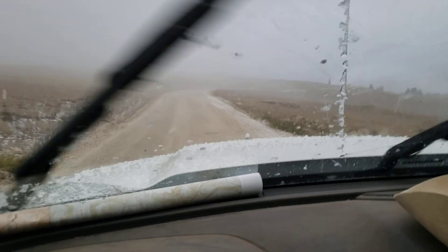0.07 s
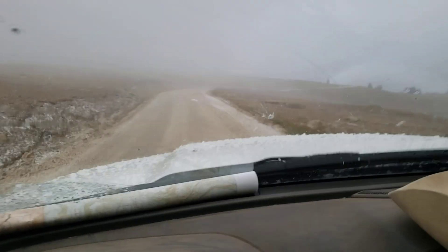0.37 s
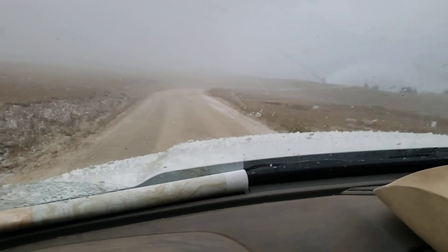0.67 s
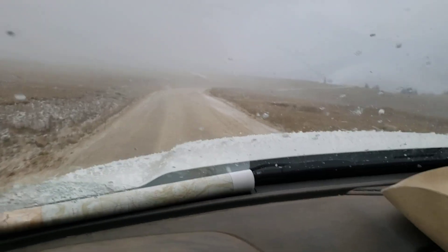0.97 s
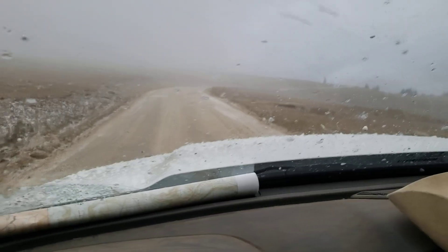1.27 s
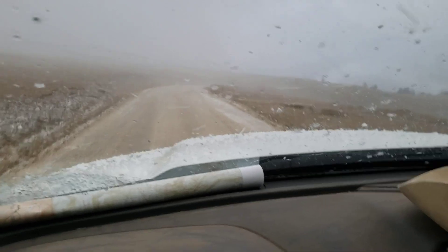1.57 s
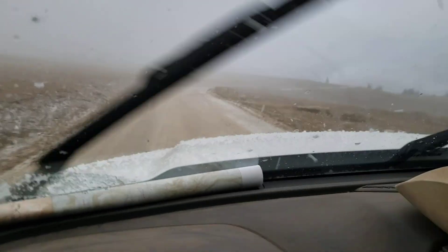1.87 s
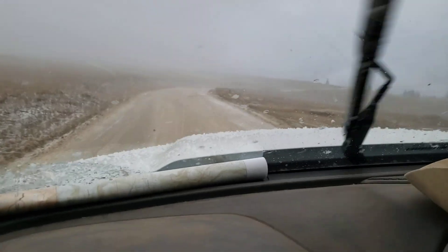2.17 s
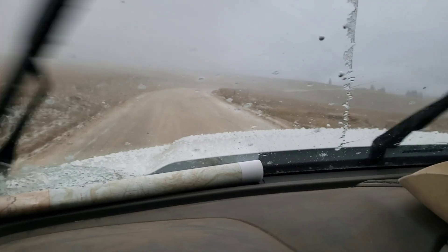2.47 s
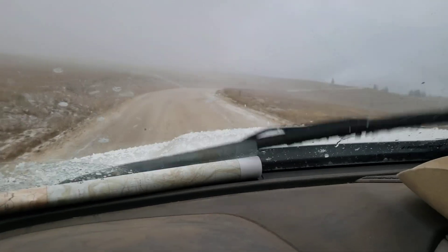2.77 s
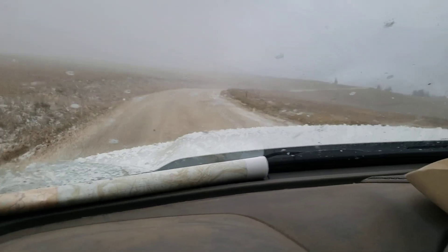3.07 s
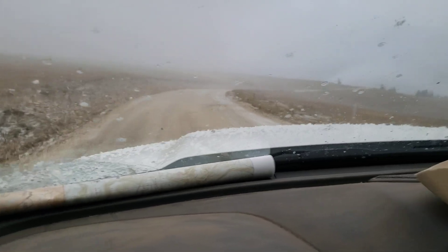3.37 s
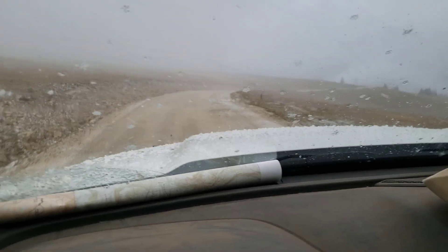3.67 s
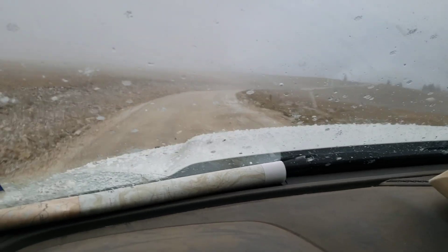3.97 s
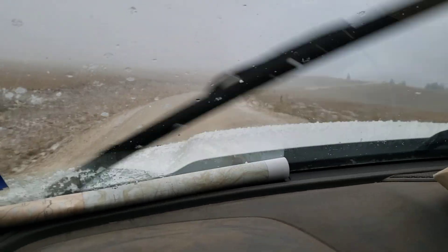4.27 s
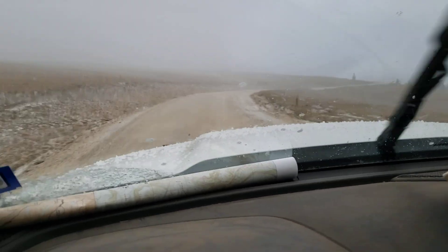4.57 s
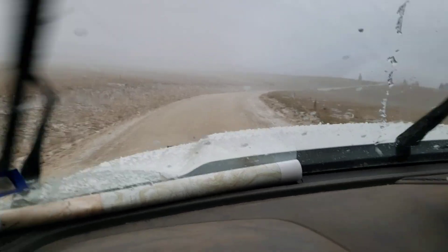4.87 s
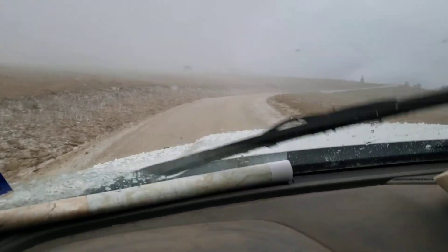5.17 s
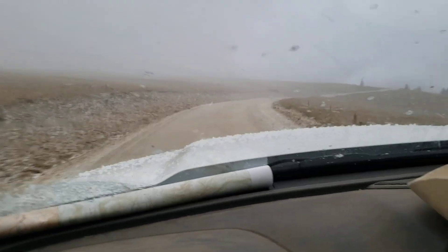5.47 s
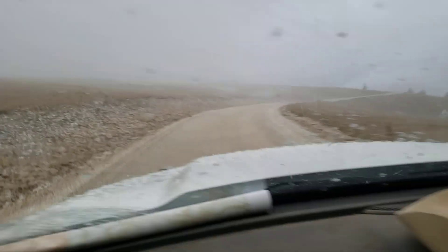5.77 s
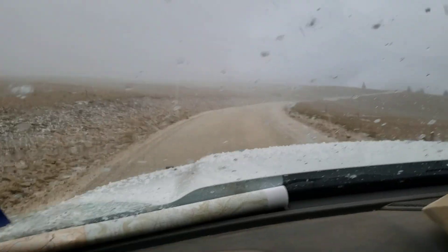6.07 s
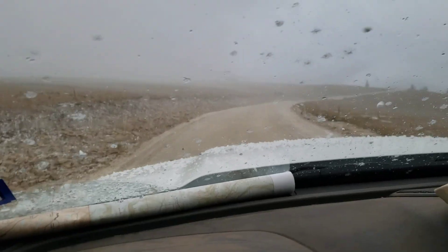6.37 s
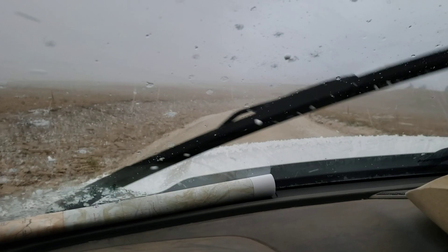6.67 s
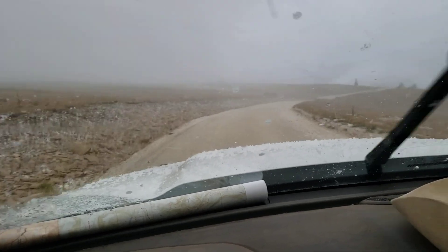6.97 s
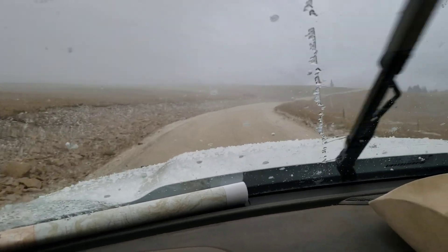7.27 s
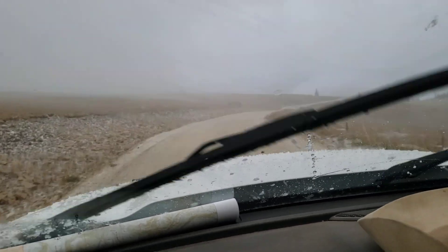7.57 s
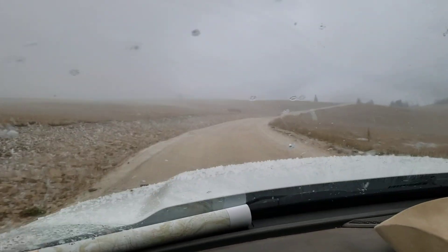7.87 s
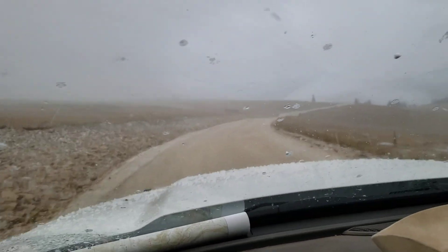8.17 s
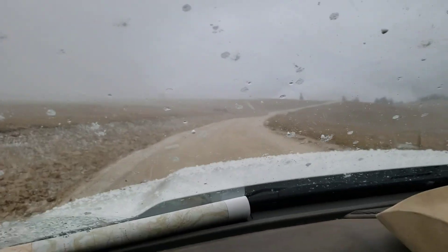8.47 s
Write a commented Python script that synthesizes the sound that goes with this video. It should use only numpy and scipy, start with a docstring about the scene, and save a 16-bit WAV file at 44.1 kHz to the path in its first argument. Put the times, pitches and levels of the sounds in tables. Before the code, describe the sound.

Sleet patters densely on the windscreen of a slow car, with harder ice pellets snapping against the glass in bright, splashy ticks. Underneath, a low engine drone and road rumble continue, swelling into booms at bumps in the dirt road. Tyres softly crunch grit and hiss through slush, loose trim knocks dully, and wipers swish faintly every few seconds. The microphone is inside the cabin.

```python
"""Sleet patters on a windscreen over engine drone and road rumble, heard inside a slow car on a dirt road.
Ice pellets ring the pane; hard ones splash into bright fragments. Tyres crunch grit, fling stones and
throw up hissing slush. Bumps shake the chassis and cabin panels boom. Wipers swish over the wet glass
about every 2.5 s. Dull cabin knocks come from loose trim and from wipers turning at the top of a stroke."""
import sys
import numpy as np
from scipy import signal
from scipy.fft import rfft, irfft, next_fast_len
from scipy.io import wavfile
from scipy.ndimage import map_coordinates

SR = 44100
rng = np.random.default_rng(int(sys.argv[2]) if len(sys.argv) > 2 else 0)


def put_to_file(sound):
    """Save the sound as 16-bit audio at rate SR, in the file named by the first command-line argument."""
    columns = np.atleast_2d(sound).T  # one column per channel
    safe = np.clip(columns, -1, 1)
    whole_steps = np.round(safe * 32767)
    wavfile.write(sys.argv[1], SR, whole_steps.astype(np.int16))


N = 384111

# shower strength: time_s, level_db
SHOWER_LEVEL = [(0.0, -44.5), (0.39, -48.3), (0.51, -42.5), (0.87, -49), (0.96, -44), (1.53, -47.5),
                (1.68, -39), (1.77, -54.5), (1.89, -46), (2.54, -53.5), (2.87, -41), (3.02, -54.5),
                (3.14, -44), (3.38, -53.5), (3.5, -45), (3.71, -50), (3.86, -41.5), (4.1, -54.5),
                (4.61, -47), (4.7, -53.5), (5.99, -45.5), (6.11, -49.5), (6.38, -43.5), (6.44, -53),
                (6.85, -47.5), (6.94, -55.5), (7.09, -49), (7.78, -46.5), (8.02, -57.5), (8.08, -45.5),
                (8.35, -45), (8.71, -55)]
# engine: time_s, firing_hz, level_db
ENGINE_TRACK = [(0, 48.5, -32), (.8, 49, -30), (2.2, 50, -29), (3.6, 49.3, -29), (5, 48, -30),
                (6.5, 47.3, -30), (8.71, 47, -29)]
# road bumps: start_s, length_s, rumble_db, boom_db
BUMPS = [(0.53, 0.13, -24.5, -48), (1.102, 0.08, -21.5, -30), (1.41, 0.27, -26, -31.5),
         (1.903, 0.13, -25.5, -30.5), (3.368, 0.18, -26.5, -33), (4.246, .16, -25, -33),
         (4.716, 0.089, -25.5, -30.5), (5.03, 0.3, -26.5, -55), (5.64, 0.045, -21, -30.5),
         (5.908, .2, -23, -31), (6.23, 0.38, -30.5, -35), (6.795, 0.31, -29.5, -65),
         (7.222, 0.05, -32, -30.5), (7.58, 0.17, -27, -33), (7.966, 0.12, -23, -47),
         (8.108, 0.33, -26, -33.5), (8.42, 0.18, -24, -32)]
# slush sheets: centre_s, length_s, level_db
SLUSH_SHEETS = [(2.01, 0.18, -52), (6.1, 0.71, -52), (8.42, .45, -47.5)]
# heavy pellets: start_s, level_db, pitch_hz, splash_db
PELLETS = [(0.0106, -22, 2950, -25), (0.0909, -21.5, 2040, -13.5), (0.2533, -18, 3400, -25),
           (0.4723, -27, 1640, -51), (0.5476, -28, 3960, -16), (0.6065, -43, 3660, 3),
           (0.7401, -17, 2050, -13.5), (0.8313, -23.5, 3850, -28), (0.849, -24, 3540, -29),
           (0.9106, -18, 2030, -15.5), (0.9882, -21, 2150, -16), (1.0017, -23, 2720, -20),
           (1.0366, -28, 2300, -3), (1.0693, -19.5, 2280, -20), (1.1583, -21, 2400, -40),
           (1.231, -24.5, 2290, -36), (1.258, -20, 3560, -12), (1.3944, -26, 2360, -46),
           (1.5923, -23, 2330, -18), (1.6327, -22.5, 2160, -20), (1.9121, -22, 2380, -21),
           (2.2333, -26, 1960, -13), (2.2468, -22.5, 2140, -11), (2.2972, -25.5, 2810, -20),
           (2.3231, -24.5, 2100, -7), (2.59, -25.5, 2150, -14), (2.6332, -22, 3450, -25),
           (2.7492, -21.5, 2400, -20), (2.8295, -21.5, 2380, -23), (3.0115, -26.5, 1410, -15),
           (3.1522, -20, 1980, -33), (3.1597, -18.5, 3350, -14), (3.172, -21.5, 2620, -27),
           (3.2076, -22.5, 1610, -27), (3.488, -24.5, 1860, -25), (3.6295, -27, 2100, -30),
           (3.7454, -19.5, 1400, -21), (3.799, -24.5, 2600, -31), (3.8372, -20.5, 3720, -8.5),
           (3.9956, -22, 4160, -6), (4.1809, -21.5, 2040, -15), (4.485, -25, 2300, -17),
           (4.5679, -28, 1610, -6), (4.5844, -36, 2330, 0), (4.6187, -23, 2450, -21),
           (4.8234, -26.5, 2450, -22), (5.1533, -21.5, 1500, -29), (5.6022, -21.5, 3020, -4.5),
           (5.666, -22.5, 2200, -18), (5.8504, -23, 3400, -10), (6.1511, -25, 2050, -19),
           (6.1978, -19, 3200, -17), (6.2946, -20.5, 2200, -6), (6.3809, -30.5, 2160, -18),
           (6.41, -23.5, 2610, -20), (6.5527, -26.5, 2580, -16), (6.8048, -21, 3600, -21),
           (6.8427, -23, 2080, -23), (7.0655, -23.5, 2290, -13), (7.1373, -24.5, 2080, -23),
           (7.5831, -24, 2040, -16), (7.665, -31, 2070, -28), (7.8278, -26.5, 1300, -1.5),
           (7.913, -25, 1320, -22), (8.184, -35, 3070, 1), (8.3427, -21.5, 1820, -25)]
# dull cabin knocks (loose trim, wipers turning): start_s, level_db
KNOCKS = [(.096, -21), (0.677, -15), (.686, -18), (1.135, -26), (2.236, -21.5), (2.252, -35), (4.46, -23.5),
          (4.963, -24), (4.985, -20.5), (5.576, -22.5), (7.134, -23), (8.685, -22.5)]
# knock modes: pitch_hz, level_db, t60_s
KNOCK_MODES = [(463, 0, .12), (748, -9, .06), (860, -4, .05), (1066, -3, .04), (1380, -7, .03),
               (1631, -8, .03)]
# wheel jolts: start_s, level_db, pitch_hz
JOLTS = [(1.522, -7.5, 87.5), (1.575, -17.5, 263), (1.936, -14.5, 157), (3.422, -27.5, 263),
         (4.281, -24, 250), (5.949, -19, 244), (6.03, -68, 86), (8.229, -16, 254), (8.235, -14, 91)]
# cabin sound field: freq_hz, left_right_correlation
COHERENCE = [(60, .98), (130, .96), (290, .85), (640, .4), (1000, -.1), (1350, -.35), (2200, .05),
             (5000, -.05)]
# pane and cabin decay: freq_hz, t60_s
PANE_DECAY = [(500, .05), (1500, .038), (4000, .02), (12000, .012)]
CABIN_DECAY = [(300, .15), (2000, .1), (6000, .06), (15000, .045)]
# source spectra: freq_hz, gain_db
GLASS_EQ = [(200, -26.5), (450, 3), (900, 0), (1300, -2), (2200, -0.5), (3700, 0.5), (5200, 0), (6900, -4),
            (7900, -1), (9000, -10.5), (10500, -10), (12500, -5), (15300, -2), (17000, -41)]
PATTER_EQ = [(200, -33), (500, -5), (1200, 1.5), (2200, 5.5), (3600, 1), (5000, -4), (8000, -9),
             (16000, -6)]
SPRAY_EQ = [(2000, -28), (5000, -1), (9000, -10), (15000, -1.5)]
RUMBLE_EQ = [(12, -45), (24, 5), (34, -37.5), (45, -2), (62, 4), (75, 7.5), (86, 5), (95, -1), (110, 3.5),
             (135, -15.5), (220, -49.5), (900, -120)]
BOOM_EQ = [(80, -27), (125, -5), (153, 1), (185, -2), (207, -6), (240, -3.5), (263, -4), (280, -8),
           (340, -11.5), (450, -20.5), (900, -36), (3000, -120)]
TYRE_EQ = [(150, -36.5), (350, 1), (500, 1), (800, -3.5), (1200, -9), (2500, -16), (5000, -31),
           (14000, -60)]
SWAY_EQ = [(12, -64), (24, -35), (33, 30), (42, 17), (60, 2), (400, -120)]
WIPER_EQ = [(200, -40), (600, 8), (1400, 3.5), (3000, -23), (8000, -15), (16000, -44)]
CLATTER_EQ = [(200, -15), (500, 0), (1200, -1), (2500, -7), (6000, -22), (12000, -32)]


def amp(db):
    return 10 ** (np.asarray(db) / 20)


def unit_rms(x):
    return x / np.sqrt(np.mean(x ** 2) + 1e-20)


def log_interp(points, hz):
    """(freq_hz, value) points read on a log axis."""
    freqs_hz, values = np.transpose(points)
    return np.interp(np.log(hz + 1), np.log(freqs_hz + 1), values)


def curves(rows):
    """Per-sample curve for each column after time_s."""
    times_s, *columns = np.transpose(rows)
    return [np.interp(np.arange(N) / SR, times_s, column) for column in columns]


def wobble(rate_hz):
    """Smooth random curve."""
    knots = rng.standard_normal(int(N * rate_hz / SR) + 4)
    return map_coordinates(knots, [np.arange(N) * rate_hz / SR])


def filtered(x, gain, causal=False):
    """Apply gain(hz); causal (minimum phase) keeps attacks sharp."""
    size = x.shape[-1]
    n_fft = 2 * next_fast_len(size * 5 // 8)
    response = gain(np.fft.rfftfreq(n_fft, 1 / SR))
    if causal:
        cepstrum = irfft(np.log(np.maximum(response, 1e-6)))
        response = np.exp(rfft(np.r_[cepstrum[0], 2 * cepstrum[1:n_fft // 2]], n_fft))
    return irfft(rfft(x, n_fft) * response, n_fft)[..., :size]


def coloured(x, eq):
    return filtered(x, lambda hz: amp(log_interp(eq, hz)), causal=True)


def diffuse(size):
    """Stereo white noise, left and right alike in the bass only."""
    def mid_side_gain(hz):
        correlation = np.clip(log_interp(COHERENCE, hz), -.99, .99)
        return np.sqrt([1 + correlation, 1 - correlation])
    mid, side = filtered(rng.standard_normal((2, size)), mid_side_gain)
    return unit_rms(np.array([mid + side, mid - side]))


def noise(eq, size=N):
    return unit_rms(coloured(diffuse(size), eq))


def add(track, start_s, sound):
    start = int(np.clip(round(start_s * SR), 0, N - 1))
    track[:, start:start + sound.shape[-1]] += sound[..., :N - start]


def tails(decay, count, size=4096):
    """Unit-energy stereo decays, t60 set per frequency."""
    white = diffuse(count * size).reshape(2, count, size).swapaxes(0, 1)
    hz, t, bins = signal.stft(white, SR, nperseg=64)
    fade = amp(-60 * t / log_interp(decay, hz)[:, None])
    ring = signal.istft(bins * fade, SR, nperseg=64)[1][..., :size]
    return ring / np.sqrt(np.sum(ring ** 2, axis=-1, keepdims=True))


def impacts(count, snap_db, cabin_db, spread_s=.00035, contact_s=.0006, rise_s=.0004):
    """Blows across the windscreen: contact snap, short pane ring, cabin reflections."""
    ring = tails(PANE_DECAY, count)
    t = np.arange(ring.shape[-1]) / SR
    ring *= 1 - np.exp(-t / rise_s)
    snaps = rng.standard_normal((count, len(t))) * np.exp(-t / contact_s)
    snaps /= np.linalg.norm(snaps, axis=1, keepdims=True)
    # nearer side first
    lags_s = np.maximum(np.round(rng.normal(0, spread_s, (count, 1)) * [1, -1] * SR), 0) / SR
    direct = np.array([[np.interp(t - lag_s, t, snap, left=0) for lag_s in pair]
                       for snap, pair in zip(snaps, lags_s)])
    cabin = coloured(tails(CABIN_DECAY, count), [(1500, 1.2), (4000, 1.1), (9000, 3)])
    return coloured(ring + amp(snap_db) * direct + amp(cabin_db) * cabin, GLASS_EQ)


def scatter(blows, rate_hz, range_db, max_count=6000):
    """Blows at Poisson times and random sizes, rms 1."""
    track = np.zeros((2, N))
    draws = rng.random((max_count, 3))
    times_s = np.cumsum(-np.log(1 - draws[:, 0])) / rate_hz
    for start_s, (_, size, spot) in zip(times_s[times_s < N / SR], draws):
        add(track, start_s, amp(range_db * size ** 2) * blows[int(spot * len(blows))])
    return unit_rms(track)


def pitched(blow, pitch_hz, boost_db=8):
    """Blow with a broad peak at pitch_hz, unit energy."""
    peak = lambda hz: amp(boost_db * np.exp(-np.log2((hz + 1) / pitch_hz) ** 2))
    blow = filtered(blow, peak, causal=True)
    return blow / np.linalg.norm(blow)


def shower_swing_db():
    """Shower strength about its mean."""
    level_db, = curves(SHOWER_LEVEL)
    return level_db - level_db.mean()


def shower(patter_db=3, spray_db=-17.5):
    """Small pellets patter on glass and bonnet; wet ones burst into bright ticks."""
    level_db, = curves(SHOWER_LEVEL)
    blows = impacts(count=96, snap_db=-4, cabin_db=-1)
    patter = unit_rms(coloured(scatter(blows, rate_hz=280, range_db=20), PATTER_EQ))
    spray = unit_rms(coloured(scatter(blows, rate_hz=300, range_db=19), SPRAY_EQ))
    return amp(level_db + patter_db) * patter + amp(level_db + spray_db) * spray


def engine(uneven_db=-2, second_db=-12, waver_db=2):
    """Firing note plus orders 1.5 and 2 from uneven cylinders."""
    firing_hz, level_db = curves(ENGINE_TRACK)
    phase = 2 * np.pi * np.cumsum(firing_hz) / SR
    uneven = amp(uneven_db + waver_db * wobble(3)) * np.sin(1.5 * phase + .5 * wobble(4))
    second = amp(second_db) * np.sin(2 * phase + .5 * wobble(5))
    return amp(level_db) * (np.sin(phase) + uneven + second)


def road(rumble_db=-29.5, boom_db=-37, sway_db=-37, attack_s=.04, release_s=.06):
    """The road shakes the chassis and drums the panels, harder at bumps; the body sways deep below."""
    t = np.arange(N) / SR
    rumble_gain, boom_gain = amp(rumble_db), amp(boom_db)
    for start_s, length_s, bump_rumble_db, bump_boom_db in BUMPS:
        push = np.clip((t - start_s) / attack_s, 0, 1)
        push *= np.exp(-np.maximum(t - start_s - length_s, 0) / release_s)
        rumble_gain = np.hypot(rumble_gain, amp(bump_rumble_db) * push)
        boom_gain = np.hypot(boom_gain, amp(bump_boom_db) * push)
    sway = amp(sway_db) * noise(SWAY_EQ)
    return rumble_gain * noise(RUMBLE_EQ) + boom_gain * noise(BOOM_EQ) + sway


def tyres(level_db=-45.5, grit_db=5.5, clump_db=1.5, cabin_db=-10):
    """Slush and grit crunch in clumps under the tyres, coloured by cabin resonances."""
    crunch = noise(TYRE_EQ) * amp(grit_db * wobble(60) + clump_db * wobble(11))
    cabin = signal.fftconvolve(crunch, tails(CABIN_DECAY, count=1)[:, 0], axes=1)[:, :N]
    return amp(level_db + shower_swing_db() / 2) * unit_rms(crunch + amp(cabin_db) * cabin)


def slush(film_db=-68, grain_db=1.5):
    """Wet tyres sizzle faintly and throw up hissing sheets after deep ruts."""
    t = np.arange(N) / SR
    sheets = sum(amp(level_db) * np.exp(-(2 * (t - centre_s) / length_s) ** 2)
                 for centre_s, length_s, level_db in SLUSH_SHEETS)
    sizzle = unit_rms(noise(SPRAY_EQ) * amp(grain_db * wobble(140)))
    return (amp(film_db) + sheets) * sizzle


def wipers(start_s=-.83, period_s=2.46, stroke_s=.64, level_db=-53):
    """Rubber swishes over wet glass, loudest mid-stroke: up, back, rest."""
    strokes = (np.arange(N) / SR - start_s) % period_s / stroke_s
    speed = np.abs(np.sin(np.pi * np.clip(strokes, 0, 2)))
    return amp(level_db) * speed * noise(WIPER_EQ)


def heavy_pellets(gain_db=21, splash_gain_db=14.5):
    """Each rings the pane around its own pitch; hard ones splash into bright fragments."""
    track = np.zeros((2, N))
    blows = impacts(count=len(PELLETS), snap_db=-3, cabin_db=-1)
    for (start_s, level_db, pitch_hz, splash_db), blow in zip(PELLETS, blows):
        splash_eq = [(5000, 0), (11250, splash_db + splash_gain_db)]
        add(track, start_s, amp(level_db + gain_db) * coloured(pitched(blow, pitch_hz), splash_eq))
    return track


def gravel(level_db=-46, centre_hz=1000):
    """Stones flung by the tyres knock dully on wheel arches and floor."""
    stones = scatter(impacts(count=32, snap_db=-12, cabin_db=3), rate_hz=40, range_db=9)
    arch_band = lambda hz: 1 / (1 + np.log2((hz + 1) / centre_hz) ** 4)
    return amp(level_db + shower_swing_db() / 2) * unit_rms(filtered(stones, arch_band, causal=True))


def medium_pellets(count=70, level_db=-45.5, spread_db=1, pitch_hz=2400, splash_db=-3, follow=.73):
    """Taps on the pane at loose intervals, each with its own size, pitch and splash."""
    track = np.zeros((2, N))
    blows = impacts(count, snap_db=-3, cabin_db=-1)
    times_s = (np.arange(count) + rng.random(count)) * N / SR / count
    traits = rng.uniform(-1, 1, (count, 3)) * np.sqrt(3)  # unit variance
    for start_s, blow, (size, detune, wetness) in zip(times_s, blows, traits):
        tap = pitched(blow, pitch_hz * 2 ** (.4 * detune))
        splash_eq = [(5000, 0), (11000, splash_db + 5 * wetness)]
        add(track, start_s, amp(spread_db * size) * coloured(tap, splash_eq))
    return amp(level_db + follow * shower_swing_db()) * unit_rms(track)


def cabin_knocks(ring_db=-9.5, clatter_db=-7, clatter_t60_s=.085, rise_s=.001):
    """Loose trim, and wipers turning at the top of their stroke: damped modes in a dull clatter."""
    track, t = np.zeros((2, N)), np.arange(SR // 4) / SR
    for start_s, level_db in KNOCKS:
        ring = np.zeros((2, len(t)))
        for pitch_hz, mode_db, t60_s in KNOCK_MODES:
            phase = 2 * np.pi * pitch_hz * rng.normal(1, .02) * t + rng.normal(0, .7, (2, 1))
            ring += amp(mode_db + rng.normal(0, 2) - 60 * t / t60_s) * np.sin(phase)
        clatter = amp(clatter_db - 60 * t / clatter_t60_s) * noise(CLATTER_EQ, len(t))
        attack = 1 - np.exp(-t / rise_s)
        add(track, start_s, amp(level_db) * attack * (amp(ring_db) * ring + clatter))
    return track


def jolts(rise_s=.0072, t60_s=.11, gain_db=5):
    """A wheel drops into a rut; a body panel booms."""
    track, t = np.zeros((2, N)), np.arange(SR // 2) / SR
    for start_s, level_db, pitch_hz in JOLTS:
        envelope = amp(level_db + gain_db - 60 * t / t60_s) * (1 - np.exp(-t / rise_s))
        add(track, start_s, envelope * np.sin(2 * np.pi * pitch_hz * t))
    return track


def scene():
    """Sleet slightly right, body rumble slightly left, the rest centred."""
    sleet = (heavy_pellets() + medium_pellets() + shower() + slush()) * amp([[-1], [1]])
    body = (road() + engine() + jolts()) * amp([[.7], [-.7]])
    return sleet + body + tyres() + gravel() + cabin_knocks() + wipers()


def record(dry):
    """Brick-wall low-pass at 16 kHz."""
    return filtered(dry, lambda hz: 1.0 * (hz < 16000))


dry = scene()
out = record(dry)
put_to_file(out)
```